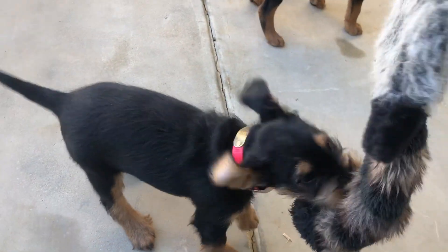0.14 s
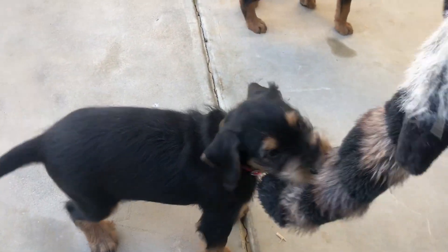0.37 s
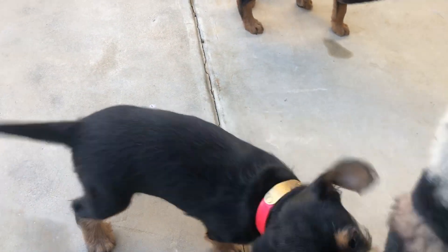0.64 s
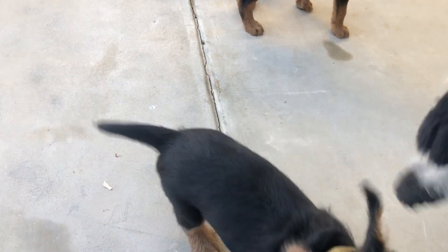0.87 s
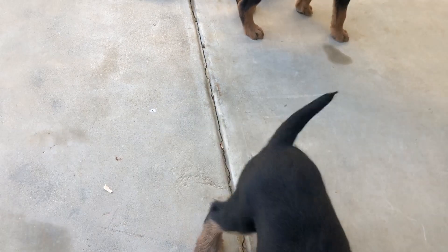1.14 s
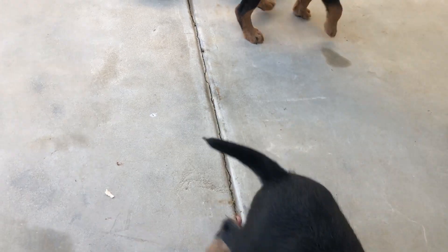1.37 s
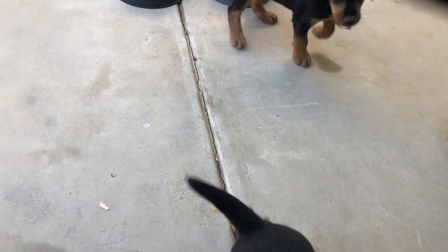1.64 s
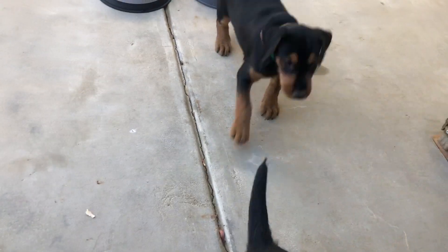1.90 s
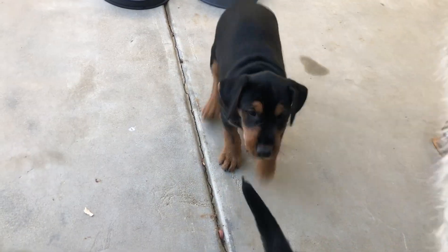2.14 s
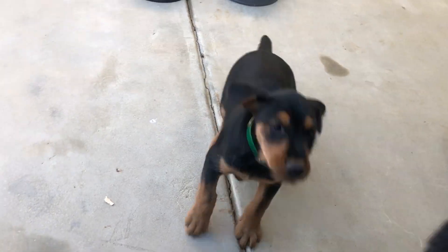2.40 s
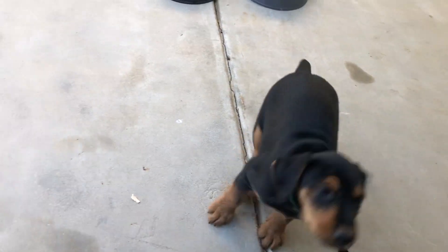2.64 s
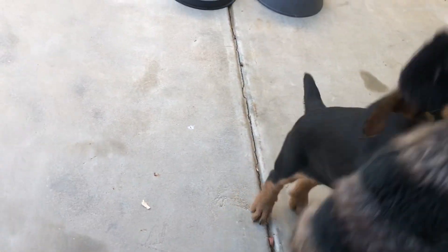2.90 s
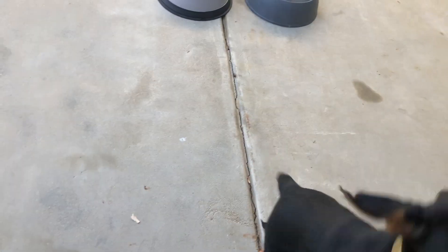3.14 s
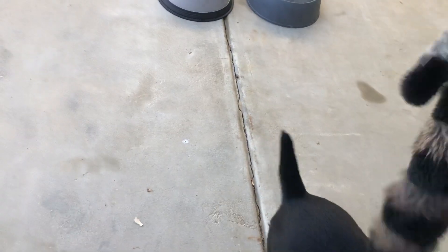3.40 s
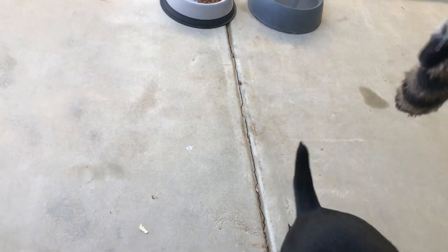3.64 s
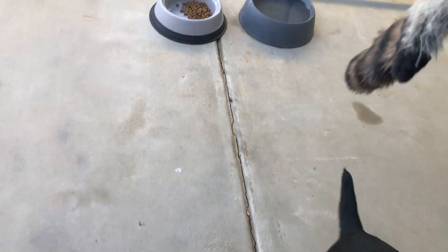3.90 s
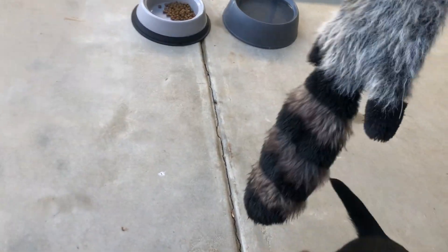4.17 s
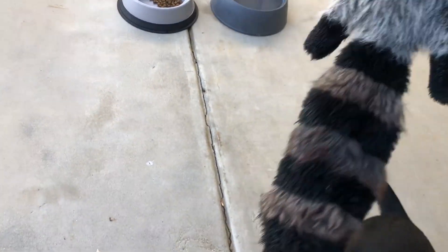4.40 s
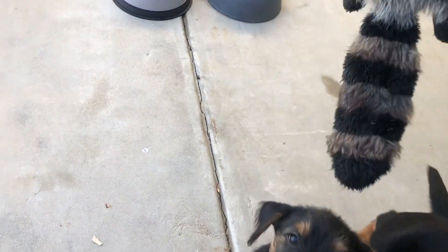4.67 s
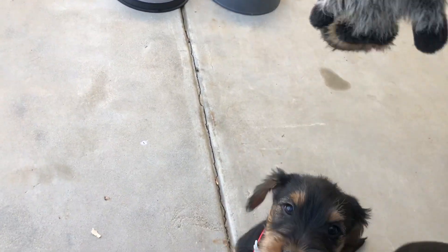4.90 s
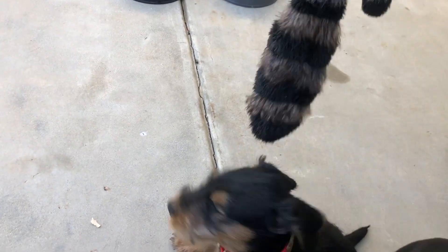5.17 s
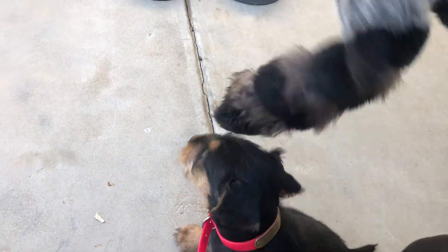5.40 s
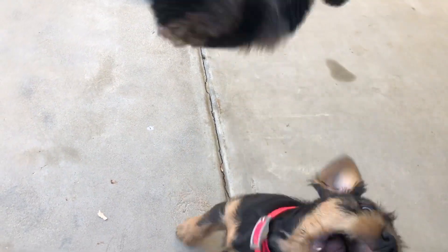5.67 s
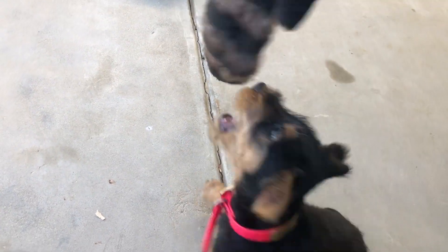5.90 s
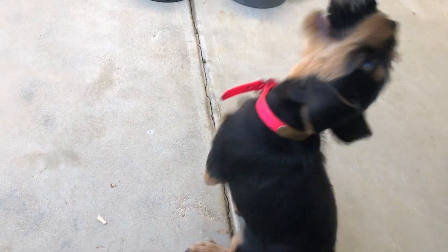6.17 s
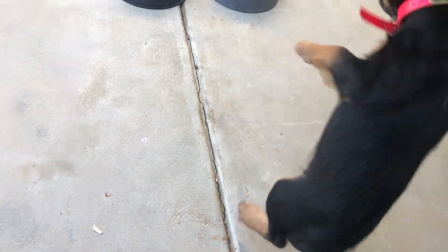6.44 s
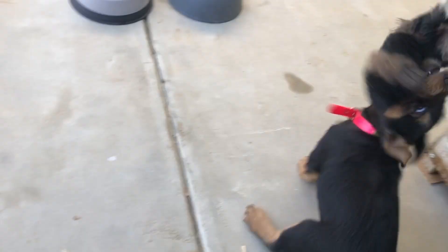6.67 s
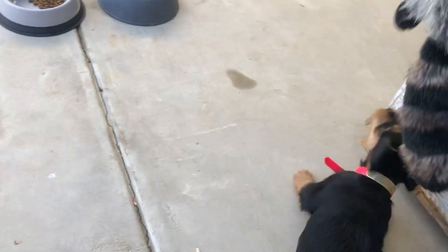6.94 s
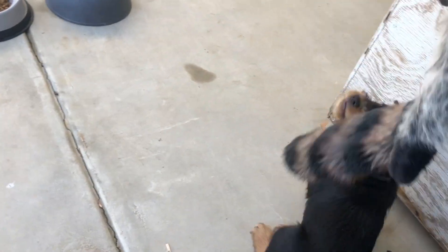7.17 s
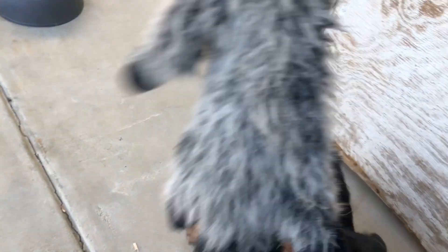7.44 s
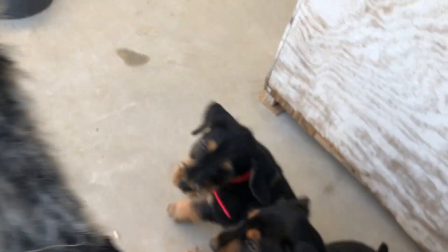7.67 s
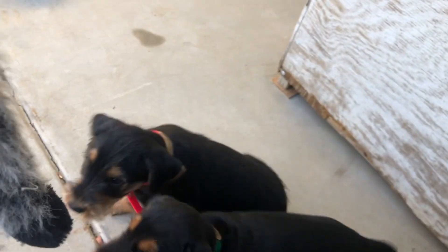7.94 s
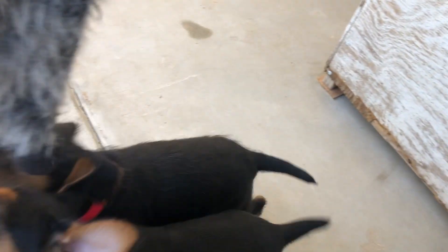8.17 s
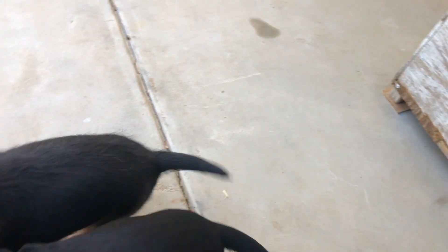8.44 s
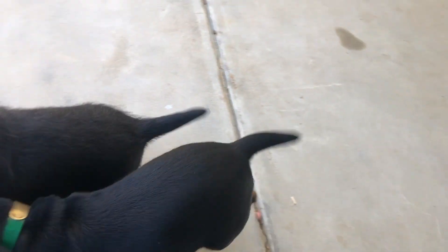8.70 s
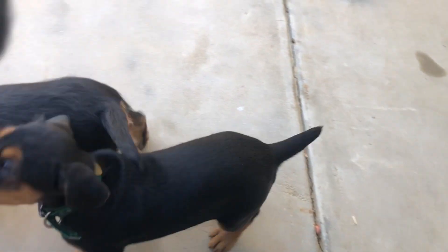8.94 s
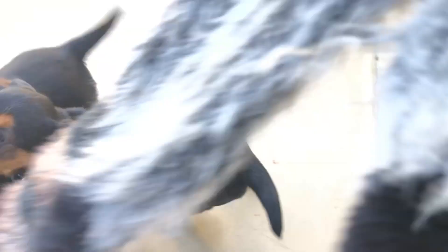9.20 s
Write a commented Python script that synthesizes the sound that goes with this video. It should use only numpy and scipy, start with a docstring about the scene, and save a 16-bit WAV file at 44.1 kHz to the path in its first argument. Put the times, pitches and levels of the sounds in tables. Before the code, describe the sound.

Close handheld microphone on an outdoor concrete patio. Low wind buffets and faint traffic hum lie underneath. Puppies pull at a plush toy: several short reedy squeaks come within the first two seconds, then a clatter of hollow plastic bowl knocks near three seconds. After a quieter spell, crinkly film crackles and snaps densely from about five to seven seconds, then calms and crackles again towards the end.

```python
"""Puppies with a squeaky plush toy

Puppies tug at a toy on a concrete patio. Its squeaker, a beating reed, sums harmonics and gated hiss.
Its crinkle film is random clicks over noise; snaps and scrunches are shaped noise bursts.
A hollow plastic bowl rings as decaying modes when knocked; paws, film and shoves add dull noise.
Wind buffets and puffs on the microphone, and far traffic hums under it all, as coloured noise."""
import sys
import numpy as np
from scipy import signal
from scipy.fft import rfft, irfft, next_fast_len
from scipy.io import wavfile
from scipy.ndimage import uniform_filter1d, map_coordinates

SR = 44100
rng = np.random.default_rng(int(sys.argv[2]) if len(sys.argv) > 2 else 0)


def invert_db(level):
    """Linear amplitude ratio for a level in decibels (20 dB per decade), elementwise."""
    return 10 ** (np.asarray(level, dtype=float) / 20)


def pcm_store(signal):
    """Save signal as 16-bit PCM."""
    levels = np.round(np.clip(np.atleast_2d(signal), -1, 1) * 32767)
    wavfile.write(sys.argv[1], SR, levels.astype(np.int16).T)


N = 411012


def unit(x):
    """Scale to rms 1."""
    return x / np.sqrt(np.mean(x ** 2) + 1e-20)


def along(points, hz):
    """Interpolate (Hz, value) points on a log frequency axis."""
    f, v = np.transpose(points)
    return np.interp(np.log(hz + 1), np.log(f + 1), v)


def curve(rows):
    """One value per sample from (s, value) rows."""
    return np.interp(np.arange(N) / SR, *np.transpose(rows))


def wobble(rate_hz):
    """A smooth random curve with rate_hz knots a second."""
    knots = rng.standard_normal(int(N * rate_hz / SR) + 4)
    return map_coordinates(knots, [np.arange(N) * rate_hz / SR])


def coloured(x, spectrum):
    """Shape x by a (Hz, dB) spectrum."""
    m = next_fast_len(len(x) + 8192)
    gain = invert_db(along(spectrum, np.fft.rfftfreq(m, 1 / SR)))
    return irfft(rfft(x, m) * gain, m)[:len(x)]


def lean(hz, depth_db):
    """A broad spectral bump around one pitch."""
    return [(hz / 2.5, -depth_db), (hz, 0), (hz * 2.2, -depth_db)]


def add(track, s, sound):
    """Mix a sound into the track at s seconds."""
    part = track[round(s * SR):][:len(sound)]
    part += sound[:len(part)]


RISE_DB = 7.5  # climb over one rise time


def strokes(rows, settle_db_per_s, still_db):
    """Level in dB of the strongest stroke: a climb, a hold, a steady fall."""
    t, level_db = np.arange(0, N, 32) / SR, still_db
    for s, rise_s, hold_s, db in rows:
        climb_db = np.where(t < s, -200, RISE_DB * np.minimum((t - s) / abs(rise_s) - 1, 0))
        settling_s = np.maximum(t - s - abs(rise_s) - abs(hold_s), 0)
        level_db = np.maximum(level_db, db + climb_db - settle_db_per_s * settling_s)
    return np.interp(np.arange(N) / SR, t, level_db)


# Far traffic spectrum. Each row: frequency in Hz, relative density in dB.
TRAFFIC_SPECTRUM = [(18, -62), (30, -6.5), (118, 1.5), (255, -0.5), (506, -10), (1270, -10.5), (1750, -13),
                    (2280, -21.5), (3050, -22.5), (16500, -39)]
HUM_DB = -47


def traffic():
    """Far traffic as noise: a smooth hum with hiss on top, its level drifting."""
    level = invert_db(HUM_DB + 1.57 * wobble(12.0))
    return level * unit(coloured(rng.standard_normal(N), TRAFFIC_SPECTRUM))


# Wind strength. Each row: time in seconds, buffet level in dB before a 2 dB lift.
WIND_LEVEL = [(0, -52.5), (.76, -42.5), (1.4, -51), (1.87, -41.5), (3.2, -55), (4.4, -59.5), (6, -51.5),
              (7.5, -70), (9.32, -65)]
# Buffeting spectrum. Each row: frequency in Hz, relative density in dB.
BUFFET_SPECTRUM = [(15, -32), (25, -6), (59, 9), (139, -0.5), (305, -36), (700, -17.5), (1320, -120)]
# Puffs on the microphone. Each row: start in seconds, swing level in dB, base pitch in Hz,
# time to crest in seconds.
WIND_PUFFS = [(0.501, -31.5, 151, 0.0094), (0.677, -27, 126, 0.0067), (0.737, -28, 63.5, 0.0089),
              (1.22, -28.5, 98, 0.0069), (1.632, -30.5, 110, 0.01), (1.79, -19, 98, 0.0047),
              (2.007, -25.5, 198, 0.013), (2.027, -26, 223, 0.0052), (2.043, -17, 116.5, 0.0065),
              (2.06, -20.5, 110, 0.0051), (2.188, -28.5, 94.5, 0.009), (4.751, -29, 140, 0.012),
              (9.123, -22.5, 86, 0.0075)]


def wind():
    """Lumpy low buffeting, and puffs: a rough flap while the diaphragm swings, falling in pitch."""
    lumps = invert_db(4 * wobble(14) + 2.5 * wobble(3))
    buffet = unit(lumps * coloured(rng.standard_normal(N), BUFFET_SPECTRUM))
    out = invert_db(curve(WIND_LEVEL) + 2.0) * buffet
    t = np.arange(SR // 6) / SR
    draws = rng.standard_normal((len(WIND_PUFFS), len(t)))
    for (s, db, hz, crest_s), noise in zip(WIND_PUFFS, draws):
        # pitch falls from 4.2 to 0.8 times the base
        cycles = hz * (0.8 * t + 0.01196 * (1 - np.exp(-t / 0.0035)))
        swell = t / crest_s * np.exp(1 - t / crest_s)
        swing = swell * np.sin(2 * np.pi * cycles + 3 * noise[0])
        flap = unit(coloured(noise, [(60, -15), (250, 6.5), (600, -1.0), (1200, -48.0)]))
        flap_swell = 0.31 * t / 0.0041 * np.exp(1 - t / 0.0028)
        add(out, s, invert_db(db) * (swing + flap_swell * flap))
    return out


# Patio reverberation. Each row: frequency in Hz, 60 dB decay time in seconds.
PATIO_DECAY = [(300, 0.55), (2000, 0.76), (10000, 0.14)]


def patio(x):
    """Slab and walls answer with a decaying noise tail that dies fastest in the high treble."""
    hz, t, z = signal.stft(rng.standard_normal(SR // 2), SR, nperseg=256)
    decay = invert_db(-60 * t / along(PATIO_DECAY, hz)[:, None])
    tail = signal.istft(z * decay, SR, nperseg=256)[1]
    delayed = np.pad(x, (130, 0))  # samples
    return signal.fftconvolve(delayed, tail / np.linalg.norm(tail))[:N]


# Bodies shove and slide on the slab. Each row: start in seconds, rise in seconds, hold in seconds,
# level in dB.
SHOVES = [(4.71, 0.032, 0.13, -39)]
SLIDE_DB_PER_S = 52


def shove():
    """A dull, lumpy noise drag of fur and paws."""
    dull = [(70, -1.5), (150, 2.5), (500, -6.0), (2000, -15.5), (4000, -32.5)]
    drag = coloured(rng.standard_normal(N), dull)
    lumpy = unit(invert_db(2.7 * wobble(60)) * drag)
    return invert_db(strokes(SHOVES, SLIDE_DB_PER_S, -120)) * lumpy


# Dull bursts: paws on the slab, and low-coloured film scrunches around 6.6-6.8 s.
# Each row: start in seconds, level in dB, centre in Hz.
DULL_BURSTS = [(3.351, -46.5, 474), (3.944, -45.5, 1500), (3.992, -45.5, 1400), (4.109, -44, 670),
               (5.553, -40, 1700), (5.834, -40, 635), (6.594, -33, 1500), (6.64, -31.5, 1100),
               (6.678, -32, 1500), (6.729, -41, 1500), (6.79, -36, 2000)]
CREST_CYCLES = 4.9  # of the centre frequency


def dull_bursts():
    """Paw scuffs and low film scrunches: a dull burst of noise, longer the lower it sounds."""
    out, t = np.zeros(N), np.arange(SR // 15) / SR
    draws = rng.standard_normal((len(DULL_BURSTS), len(t)))
    for (s, db, hz), noise in zip(DULL_BURSTS, draws):
        age = t * hz / CREST_CYCLES
        burst = unit(coloured(noise, lean(hz, depth_db=19)))
        add(out, s, invert_db(db) * burst * age * np.exp(1 - age))
    return out


# Knocks on the bowl. Each row: start in seconds, overall gain in dB, crack in dB,
# lift of the modes below 800 Hz in dB, rise time constant in seconds.
BOWL_KNOCKS = [(2.8713, -12, -3, 0, 0.0015), (2.949, -29, 6, 8, 0.0028), (3.014, -19, 4.5, 0.5, 0.013),
               (3.0741, -19.5, 8.5, 3, 0.00045), (3.0938, -16.5, 7.5, -1, 0.00065),
               (3.1168, -23.5, 11, 3.5, 0.0011), (3.13, -24.5, 12.5, 3, 0.0047),
               (3.154, -33, -7.5, 10, 0.0024), (3.486, -30.5, -4.5, 10, 0.0056),
               (8.17, -26.5, 2, 17.5, 0.019), (8.442, -11.5, 5, 2.5, 0.0031)]
# Bowl modes. Each row: nominal frequency in Hz, relative level in dB, 60 dB decay time in seconds.
BOWL_MODES = [(361, -7.5, 0.049), (462, 0.5, 0.058), (627, -16.5, 0.052), (868, 5, 0.031),
              (1068, -16, 0.059), (1260, -1.5, 0.038), (1500, 1.5, 0.03), (1758, 1.5, 0.027),
              (2170, -9.5, 0.019)]


def bowl():
    """Each knock rings the plastic at new strengths; a hard edge cracks, a flat paw sounds hollow."""
    out, t = np.zeros(N), np.arange(SR // 4) / SR
    modes = len(BOWL_MODES)
    draws = rng.standard_normal((len(BOWL_KNOCKS), 2 * modes + len(t)))
    hz, level_db, t60_s = np.transpose(BOWL_MODES)[:, :, None]
    crack_spectrum = [(150, -15), (500, -4.5), (1500, 18), (2200, 6.5), (5500, 4.5), (9000, -8.5),
                      (16000, -34)]
    for (s, db, crack_db, hollow_db, rise_s), draw in zip(BOWL_KNOCKS, draws):
        strength, detune, noise = np.split(draw, [modes, 2 * modes])
        mode_db = level_db + 2.5 * strength[:, None] + (hz < 800) * hollow_db
        pitch_hz = hz * (1 + .03 * detune[:, None])  # each mode detuned at random by about 3 %
        swell = 1 - np.exp(-(t * hz / 3.8) ** 2)  # low bending waves build up later
        # the loose bowl rocks, blurring each mode
        rock = 1.2 * unit(coloured(noise, [(100, 0), (600, -60)]))
        swing = np.sin(2 * np.pi * pitch_hz * t + rock)
        ring = np.sum(invert_db(mode_db - 60 * t / t60_s) * swell * swing, 0)
        # the crack, then the rim chattering on concrete
        shiver = invert_db(-60 * t / 0.0075) + 0.29 * invert_db(-60 * t / 0.069)
        crack = invert_db(crack_db) * shiver * unit(coloured(noise, crack_spectrum))
        add(out, s, invert_db(db) * (ring + crack) * (1 - np.exp(-t / abs(rise_s))))
    return out


# Crinkle film spectrum, for scrunches, snaps and rustle. Each row: frequency in Hz,
# relative density in dB.
FILM_SPECTRUM = [(700, -7), (1200, 1.5), (2000, -2), (2700, -3.5), (7000, -4.5), (12000, -8.5), (16500, -6)]
# Handfuls of film crushed at once. Each row: start in seconds, level in dB, time to crest in seconds.
FILM_SCRUNCHES = [(2.312, -38.5, 0.0077), (2.445, -32.5, 0.0061), (5.519, -33, 0.011), (5.551, -35, 0.017),
                  (5.719, -28.5, 0.0096), (5.736, -35, 0.004), (5.781, -29.5, 0.0091), (6.043, -31, 0.008),
                  (6.783, -36, 0.0073)]


def scrunches():
    """Many creases give way together: a short, gritty noise swell."""
    out, t = np.zeros(N), np.arange(SR // 20) / SR
    draws = rng.standard_normal((len(FILM_SCRUNCHES), 2, len(t)))
    for (s, db, crest_s), (hiss, grit) in zip(FILM_SCRUNCHES, draws):
        gritty = hiss * invert_db(3.5 * unit(uniform_filter1d(grit, size=30)))
        swell = (t / crest_s * np.exp(1 - t / crest_s)) ** 2
        add(out, s, invert_db(db) * unit(coloured(gritty, FILM_SPECTRUM)) * swell)
    return out


# Single snaps of the film. Each row: time in seconds, peak in dB.
FILM_SNAPS = [(0.351, -24.5), (.568, -41), (0.656, -39), (2.013, -26), (2.1821, -27), (2.363, -22),
              (2.4766, -26), (3.887, -31), (3.908, -31), (4.375, -31), (4.878, -34), (4.9185, -20.5),
              (4.928, -27), (4.938, -23), (4.9702, -22.5), (4.9935, -23.5), (5.034, -28), (5.161, -34),
              (5.1833, -18), (5.1994, -20.5), (5.207, -22), (5.215, -23.5), (5.241, -27), (5.276, -25.5),
              (5.409, -25), (5.456, -18), (5.731, -27), (5.824, -15), (5.9232, -17.5), (6.0123, -19),
              (6.045, -25), (6.2183, -24), (6.4003, -25.5), (6.416, -24), (6.5146, -24.5), (6.5688, -23),
              (6.595, -19), (6.6337, -16.5), (7.052, -22), (8.037, -38), (8.2394, -22.5), (8.252, -22),
              (8.315, -18), (8.355, -21), (8.388, -21), (8.424, -21), (8.501, -35), (8.678, -26),
              (8.748, -27), (8.89, -25.5), (8.924, -22), (8.9904, -25), (9.006, -24), (9.0201, -21),
              (9.124, -25.5)]


def snaps():
    """A big crease gives way: a 1-2 ms broad crack of noise, each with its own lean in colour."""
    out, t = np.zeros(N), np.arange(SR // 100) / SR
    draws = rng.standard_normal((len(FILM_SNAPS), len(t) + 1))
    for (s, db), burst in zip(FILM_SNAPS, draws):
        crack = coloured(burst[1:] * t * np.exp(-t / 0.00046), FILM_SPECTRUM)
        crack = coloured(crack, lean(7500 * np.exp(.2 * burst[0]), depth_db=10))
        add(out, s - .0004, invert_db(db) * crack / np.abs(crack).max())
    return out


# Swings and tugs that work the film. Each row: start in seconds, rise in seconds, hold in seconds,
# handling effort in dB.
FILM_TUGS = [(0, 0.0079, 0.1, -61.5), (.6, 0.37, 0.12, -49), (1.6, 0.13, 0.029, -48.5),
             (2.17, 0.015, 0.0053, -44), (2.29, 0.08, 0.0085, -46.5), (2.42, 0.046, 0.059, -50),
             (2.852, 0.008, 0.02, -41), (2.89, 0.0091, 0.42, -57), (3.7, 0.22, .15, -59.5),
             (4.22, 0.11, 0.048, -54), (4.51, 0.061, 0.065, -53), (4.7, 0.18, 0.064, -49),
             (5.15, 0.041, 0.042, -46), (5.265, 0.0073, 0.011, -41), (5.355, 0.011, 0.48, -39),
             (5.66, 0.036, 0.071, -38), (5.86, 0.15, 0.048, -39), (6.1, 0.065, 0.34, -48.5),
             (6.563, 0.043, 0.076, -36.5), (6.72, 0.017, 0.034, -43), (6.86, 0.1, 0.093, -51),
             (7.13, 0.13, 0.1, -56.5), (7.85, 0.14, 0.098, -61), (8.22, 0.016, 0.0083, -47),
             (8.29, 0.14, 0.11, -43), (8.6, 0.014, 0.24, -56), (8.82, 0.0081, 0.27, -47)]
SETTLE_DB_PER_S, STILL_DB = 139, -81  # how fast the film settles, the toy at rest


def rustle():
    """Creases of three sizes flip as unequal clumped clicks over hiss; hard handling flips more."""
    effort_db = strokes(FILM_TUGS, SETTLE_DB_PER_S, STILL_DB)
    clump = wobble(70)
    flips_per_s = 260 * invert_db(.3 * (effort_db + 50) + 2.6 * clump)
    t = np.arange(SR // 200) / SR
    sliding = unit(invert_db(1.6 * clump) * rng.standard_normal(N))
    film = invert_db(-2 + .55 * (effort_db + 40.5)) * sliding
    for hz in (1800, 5500, 11000):
        chance, size = rng.random((2, N))
        heights = invert_db(-3 * np.log(size + 100 / hz)) / np.sqrt(invert_db(.3 * (effort_db + 50.5)))
        flips = (chance < flips_per_s / SR) * heights
        crease = t * np.exp(-t * hz / 2)  # large creases flip slower
        clicks = signal.fftconvolve(flips, crease)[:N] * rng.standard_normal(N)
        # the three sizes keep nearly the same balance at any effort
        balance = invert_db(0.0037 * (effort_db + 23.0) * np.log2(5500 / hz))
        film += balance * unit(coloured(clicks, lean(hz, depth_db=10)))
    return invert_db(effort_db) * unit(coloured(film, FILM_SPECTRUM))


# Squeaker bites, one sub-table each, from first sound to release. Each row: time in seconds,
# reed pitch in Hz.
BITE_PITCHES = [
    [(0.8915, 1534), (0.8945, 1105), (0.912, 1053), (0.928, 962), (0.938, 967)],
    [(1.175, 1027), (1.189, 1074), (1.223, 1000), (1.256, 993), (1.288, 934)],
    [(1.5172, 1225), (1.524, 1244), (1.544, 1093)],
    [(1.5505, 1317), (1.555, 1356), (1.563, 1228), (1.567, 1313), (1.575, 1210)],
    [(1.587, 1020), (1.601, 1027), (1.617, 930), (1.627, 930)],
    [(1.708, 1050), (1.714, 1060), (1.722, 960), (1.727, 940)],
]
# Bite character, one row per bite. Each row: level in dB, brightness in dB per octave,
# fullness around 5.5 kHz in dB, lift of the octave overtone at the start in dB.
BITE_TONES = [(-23, -1, 8.5, -13.5), (-23, -1, 0, -0.5), (-18, 0.5, 11, -10), (-16, -0.5, 13, -4),
              (-28, -0.2, 6, 0), (-27.5, -0.2, 2, -5)]
# Reed leak, one value per bite: air noise power share at the end of the bite, 0-1.
BITE_LEAKS = [.1, 0, .15, .7, .05, .1]
# Squeaker pipe response. Each row: frequency in Hz, gain in dB.
PIPE_RESPONSE = [(600, -12), (1000, 0), (2100, -5), (3100, -17), (4300, -13), (6300, -24), (7500, -9),
                 (9000, -11), (11500, -23), (15000, -19), (18000, -40)]
# Air hissing past the reed. Each row: frequency in Hz, relative density in dB.
AIR_SPECTRUM = [(500, -13.5), (1800, -12), (4500, -9), (8000, -1), (12000, -30), (17000, -22)]
REED_ATTACK_S, REED_RELEASE_S = .0024, 0.0077
OVERTONE_LAG_S = .0008  # per octave above the fundamental
DB_PER_SEMITONE = 5  # less pressure = lower and softer


def squeaker():
    """A beating reed: harmonics through its pipe; hiss, gated each cycle, grows as the bite closes."""
    out, order = np.zeros(N), np.arange(1, 17)[:, None]
    octaves = np.log2(order)
    for rows, tone_row, air_end in zip(BITE_PITCHES, BITE_TONES, BITE_LEAKS):
        level_db, bright_db, full_db, octave_db = tone_row
        s, pitch_hz = np.transpose(rows)
        t = np.arange(s[0], s[-1] + .025, 1 / SR)
        age_s = t - s[0]
        hz = uniform_filter1d(np.interp(t, s, pitch_hz), size=150, mode="nearest")
        semitones_down = 12 * np.log2(np.minimum(hz / pitch_hz[1], 1))
        pressure = invert_db(level_db + DB_PER_SEMITONE * semitones_down)
        spent = np.clip(age_s / (s[-1] - s[0]), 0, 1)
        attack = 1 - np.exp(-(age_s / REED_ATTACK_S) ** 2)
        gate = attack * np.exp(-np.maximum(t - s[-1], 0) / REED_RELEASE_S)
        turn = 2 * np.pi * np.cumsum(hz) / SR

        jitter = uniform_filter1d(rng.standard_normal((len(order), len(hz))), size=300, axis=1)
        flutter_db = 1.1 * np.log2(2 * order) * jitter * np.sqrt(300)
        fullness_db = full_db * np.exp(-np.log2(order * hz / 5500) ** 2 / 0.3)
        start_octave_db = (order == 2) * octave_db * (1 - spent)
        harmonic_db = along(PIPE_RESPONSE, order * hz) + bright_db * octaves
        levels = invert_db(harmonic_db + fullness_db + flutter_db + start_octave_db)
        # the reed swings before it beats
        levels = levels * (1 - np.exp(-(age_s / (OVERTONE_LAG_S * octaves + 1e-6)) ** 2))
        tone = -np.sum(levels * np.cos(order * turn + .3 * order ** 2), 0)
        # a leaky bite skips every other beat at its ends
        tone = tone * (1 + air_end * np.abs(2 * spent - 1) * np.cos(turn / 2))

        gated_noise = rng.standard_normal(len(hz)) * (1 + np.cos(turn))
        hiss = unit(coloured(gated_noise, AIR_SPECTRUM))
        air = air_end * spent ** 2
        add(out, s[0], pressure * gate * (np.sqrt(1 - air) * unit(tone) + np.sqrt(air) * hiss))
    return out


TOY_ECHO_DB, BOWL_ECHO_DB = -19, -18


def scene():
    """Toy and bowl with the patio's echo, the rest dry."""
    background = traffic() + wind() + shove() + dull_bursts()
    knocks = bowl()
    toy = scrunches() + snaps() + rustle() + squeaker()
    echo = patio(invert_db(TOY_ECHO_DB) * toy + invert_db(BOWL_ECHO_DB) * knocks)
    return (background + knocks + toy + echo)[None]


def top_cut(x):
    """Nothing passes above the cut-off."""
    return signal.sosfilt(signal.butter(12, 16990, fs=SR, output="sos"), x)


def record(dry):
    """Microphone low cut, then a steep low-pass near 16 kHz."""
    mix = coloured(dry[0], [(20, -25), (45, -2.5), (15700, 1.0), (16000, -15), (17200, -72)])
    return top_cut(mix[None])


dry = scene()
out = record(dry)
pcm_store(out)
```